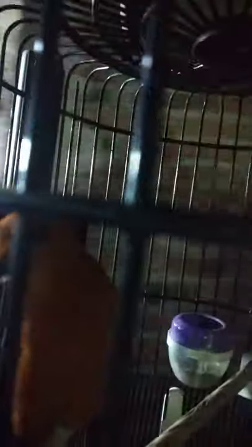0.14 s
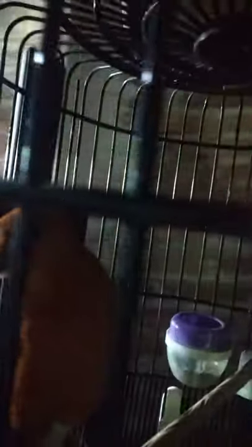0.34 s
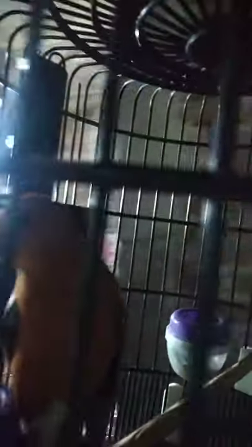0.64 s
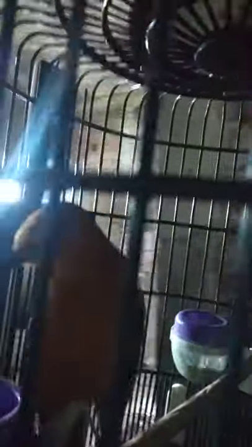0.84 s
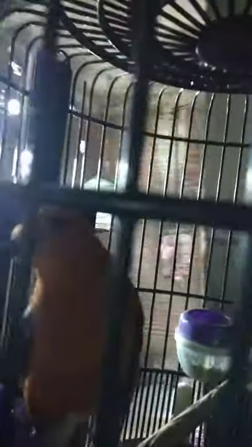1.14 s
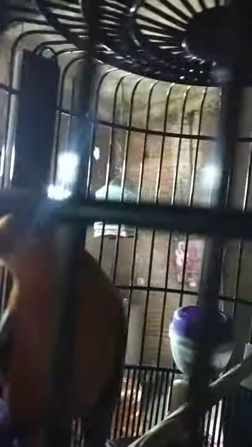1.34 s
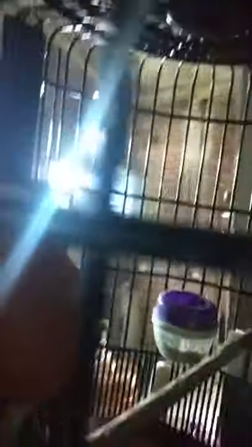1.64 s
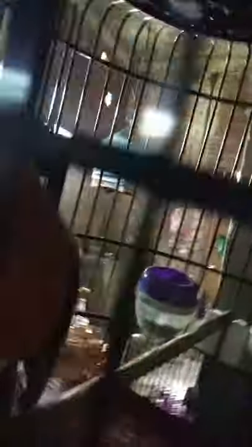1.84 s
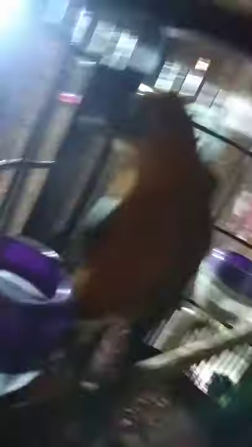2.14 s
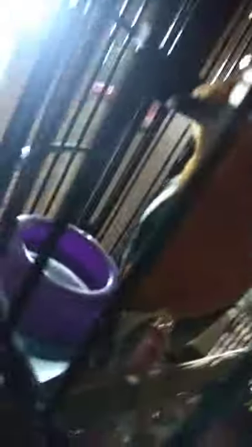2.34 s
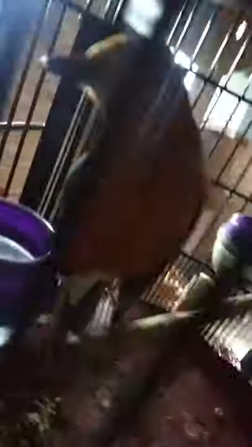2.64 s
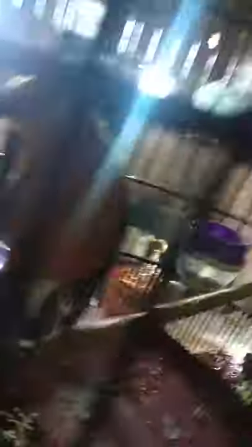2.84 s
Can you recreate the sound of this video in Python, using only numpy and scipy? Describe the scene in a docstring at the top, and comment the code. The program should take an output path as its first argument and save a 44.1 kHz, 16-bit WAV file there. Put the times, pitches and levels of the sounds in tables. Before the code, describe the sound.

Songbird whistling a gliding, at first hoarse phrase indoors, over thin high chips and a sharp click

```python
"""A caged songbird sings a phrase of slurred whistles in a hard-walled room, close to a hand-held camera:
gliding near-sine tones with overtones and air hiss, hoarse at first. A smaller bird repeats a thin high
chip, a dipping sine, and a third answers with one faint rising whistle; room reflections smear every note.
At the camera a sharp click and a faint one (ringing modes), knocks (damped low rings) and scuffs (noise
swells) sit with one faint peep (a narrow noise swell) over a low background rumble of filtered noise."""
import sys
import numpy as np
from scipy import signal
from scipy.fft import rfft, irfft
from scipy.io import wavfile
from scipy.ndimage import uniform_filter1d

SR = 44100
rng = np.random.default_rng(int(sys.argv[2]) if len(sys.argv) > 2 else 0)


def transcribe(u):
    """Save the signal u as a 16-bit wav file named by the first command-line argument.

    u: samples, shape (n,) or (channels, n), limited to [-1, 1]; the rate is SR.
    q: integer samples, one column per channel.
    """
    v = np.clip(np.atleast_2d(u).T, -1, 1)
    q = np.round(v * 32767).astype(np.int16)
    wavfile.write(sys.argv[1], SR, q)


N = 132300  # 3 s in samples


def amp(db):
    """Decibels to gain."""
    return 10 ** (np.asarray(db) / 20)


def unit(x):
    """Scales to rms 1."""
    return x / np.sqrt(np.mean(x ** 2) + 1e-20)


def read(points, hz):
    """Reads a spectrum on a log-frequency axis."""
    f, value = np.transpose(points)
    return np.interp(np.log(hz + 1), np.log(f + 1), value)


def add(mix, s, sound):
    """Mixes a sound in at s seconds."""
    part = mix[:, max(round(s * SR), 0):][:, :sound.shape[-1]]
    part += sound[..., :part.shape[1]]


def pan(db):
    """Left and right gains of equal total power, left louder than right by db."""
    return unit(amp([[db / 2], [-db / 2]]))


def noise(size, gain):
    """Start of a noise of rms 1 with the spectrum gain(hz)."""
    spectrum = rfft(rng.standard_normal(N)) * gain(np.fft.rfftfreq(N, 1 / SR))
    return unit(irfft(spectrum, N))[:size]


def hump(f, centre_hz, width_hz):
    """Gain of one broad resonance."""
    return 1 / (1 + (2 * (f - centre_hz) / width_hz) ** 2)


def later(x, s):
    """Delays a sound by s seconds, to a fraction of a sample, with a phase slope."""
    size = x.shape[-1]
    return irfft(rfft(x) * np.exp(-2j * np.pi * np.fft.rfftfreq(size, 1 / SR) * s), size)


def arrive(x, lag_s):
    """Direct sound at two spaced microphones, the right one lag_s later."""
    return np.array([x[0], later(x[1], lag_s)])


def turns(hz):
    """Phase in radians of a tone whose pitch moves."""
    return 2 * np.pi * np.cumsum(hz) / SR


def glide(points, fade_s=0.0014):
    """Time, pitch and loudness along one slurred note."""
    s, hz, db = np.transpose(points)
    t = np.arange(s[0], s[-1], 1 / SR)
    ends = np.clip(np.minimum(t - t[0], t[-1] - t) / fade_s, 0, 1)
    pitch = uniform_filter1d(np.interp(t, s, hz), size=400)  # rounds the corners of the slur
    return t, pitch, ends * amp(np.interp(t, s, db))


def songbird():
    """A near-sine whistle, steadiest when loud, with overtones and air hiss; when hoarse it buzzes and rasps."""
    # One list for each whistle. Each row: time in seconds, pitch in Hz, level in dB before the path gains.
    whistles = [
        [(1.052, 2256, -55.5), (1.068, 2384, -41.5), (1.10, 2402, -33), (1.112, 2826, -30.5),
         (1.136, 3250, -25), (1.178, 3033, -24.5), (1.208, 2654, -22.5), (1.285, 2558, -23), (1.335, 2518, -28),
         (1.42, 2577, -39.5)],
        [(1.455, 2546, -42.5), (1.485, 2463, -27.5), (1.52, 2290, -32), (1.555, 2036, -38), (1.585, 2040, -55)],
        [(1.648, 2510, -38.5), (1.675, 2483, -29), (1.70, 2253, -31), (1.73, 2023, -33.5), (1.775, 2017, -30.5),
         (1.808, 2437, -31), (1.85, 2439, -23), (1.872, 2450, -52)],
        [(2.008, 5216, -35.5), (2.03, 5076, -29.5), (2.055, 4704, -23), (2.085, 4370, -25), (2.16, 4192, -24.5),
         (2.22, 4062, -23), (2.27, 3993, -29.5), (2.30, 3820, -65)],
        [(2.348, 3680, -50), (2.38, 3333, -20.5), (2.41, 3232, -26), (2.445, 3188, -24.5), (2.48, 3170, -43)],
        [(2.52, 3476, -45), (2.54, 3304, -19), (2.59, 3220, -27), (2.615, 3176, -20.5), (2.64, 3160, -39.5)],
        [(2.705, 2250, -43), (2.73, 2310, -33), (2.775, 2265, -33), (2.81, 2305, -23), (2.843, 2316, -15.5),
         (2.88, 2315, -30), (2.92, 2312, -43)],
        [(2.96, 2800, -54.5), (2.99, 3096, -28), (3.02, 3180, -31)],
    ]
    # Colour of each whistle. Each row: overtones in dB, air hiss in dB, left over right in dB,
    # pitch jitter in % when no louder than usual, room echo in dB; levels stand before the path gains.
    colours = [(-30.5, -32.5, 0.5, 0.26, -3.5), (-23, -37, -1.5, 2.4, -1), (-22, -32.5, 1, 1.92, -5.5),
               (-14.5, -27, -2, 0.73, -2), (-32, -29, -1.5, 0.74, -3), (-34, -26.5, 2, 0.32, -2.5),
               (-31.5, -27.5, 2.5, 1.6, -8.5), (-36, -36, 12, 3, 3)]
    # The phrase opens hoarsely. Each row: time in seconds, roughness from 0 to 1.
    hoarseness = [(1.06, 0.74), (1.125, 0.92), (1.17, 0.72), (1.225, 0.37), (1.27, 0)]
    # Tone of the overtones. Each row: frequency in Hz, gain in dB.
    overtone_tilt = [(4000, -5), (5000, -13), (6200, -6.5), (7500, -24.5), (8300, -4.5), (9800, 6),
                     (11200, 10.5), (12300, 1.5), (14000, -4.5), (16000, -30)]
    # Level in dB of overtones 2 to 7, before the tone above.
    harmonics_db = [3, 1.5, 3, -2.5, -9.5, -10]
    # Spectrum of the air hiss. Each row: frequency in Hz, relative density in dB per Hz.
    air_spectrum = [(1800, -4), (3500, 1.5), (4500, 3.5), (5500, 0), (7400, -9), (8600, -18), (10200, 4.5),
                    (12000, -11), (14000, -44), (16000, -32)]
    # Spectrum of the hoarse rasp. Each row: frequency in Hz, relative density in dB per Hz.
    rasp_spectrum = [(3000, -26.5), (3600, -3), (3950, 2), (4500, -3), (5300, 0), (6000, -1), (6600, 3),
                     (8000, 4.5), (10800, -4), (12500, -14.5), (14200, -22), (15500, -11)]

    jitter_hz = 201  # corner of the pitch jitter
    smear_rad, smear_hz = 0.75, 480  # breath blurs the overtones: phase wobble, its corner
    # the hoarse voice is a fast uneven trill: rate, its scatter, depth of its pulses, pitch swing
    buzz_hz, buzz_wander, buzz_pulsing, rasp_depth = 162.9, 0.256, 0.55, 0.099
    rasp_hiss_db, rasp_overtone_db = -10.5, 4.5  # hoarseness adds hiss and brings out the overtones
    edge_follows, usual_db = 0.5, -29  # the edge swells less than the whistle, around its usual level
    song_direct_db, song_lag_s = -3, 0.00009
    edge_direct_db = -10.5  # overtones and hiss reach the microphone mostly by way of the walls

    tone, wet, edge = np.zeros((3, 2, N))
    for points, (overtone_db, air_db, side_db, jitter_percent, room_db) in zip(whistles, colours):
        t, hz, level = glide(points)
        rough = np.interp(t, *np.transpose(hoarseness), right=0)

        jitter = noise(len(t), lambda f: 1 / (1 + (f / jitter_hz) ** 4))
        share = jitter_percent / 100 * np.minimum(amp(usual_db) / level, 1) ** 2
        buzz = turns(buzz_hz * (1 + buzz_wander * jitter))
        pulses = 1 + buzz_pulsing * rough * np.cos(buzz)
        phase = turns(hz * (1 + share * jitter - rasp_depth * rough ** 2 * np.sin(buzz)))
        whistle = pan(side_db) * level * pulses * np.sqrt(2) * np.sin(phase)

        smear = smear_rad * noise(len(t), lambda f: 1 / (1 + (f / smear_hz) ** 2))
        overtones = 0
        for k, db in enumerate(harmonics_db, 2):
            gain = amp(db + read(overtone_tilt, k * hz)) * (k * hz < SR / 2)
            overtones = overtones + gain * np.sin(k * phase + smear)
        overtones = np.sqrt(2) * amp(overtone_db + rasp_overtone_db * rough) * overtones
        air = noise(len(t), lambda f: amp(read(air_spectrum, f))) * amp(air_db)
        rasp = noise(len(t), lambda f: amp(read(rasp_spectrum, f))) * amp(rasp_hiss_db) * rough
        swell = amp(usual_db) * (level / amp(usual_db)) ** edge_follows * pulses

        add(tone, t[0], whistle)
        add(wet, t[0], amp(room_db) * whistle)
        add(edge, t[0], swell * (overtones + air + rasp))
    edge = cage(edge)
    direct = arrive(tone + amp(edge_direct_db) * edge, song_lag_s)
    return amp(song_direct_db) * direct + room(wet + edge)


def cage(x, count=4):
    """Scatter from the bars combs the treble: a few very short reflections, different on each side."""
    scatter_db, longest_s = -7.5, 0.0024
    delays = rng.uniform(0, longest_s, (2, count))
    signs = rng.choice([-1, 1], (2, count))
    scatter = np.array([sum(g * later(side, s) for s, g in zip(d, sign))
                        for side, d, sign in zip(x, delays, signs)])
    return (x + amp(scatter_db) * scatter) / np.sqrt(1 + count * amp(scatter_db) ** 2)


def small_bird():
    """Each chip dips quickly in pitch, cracks at the bottom and holds a higher note as it fades."""
    # Each row: bottom of the dip in seconds, lowest pitch in Hz, closing pitch in Hz,
    # level in dB before the path gains, fade in seconds, left over right in dB.
    chips = [(-.2, 5290, 5900, -26, 0.0093, 2), (0.2347, 5275, 5952, -23, .011, 0.5),
             (0.687, 5390, 6082, -27.5, 0.029, 6.5), (1.0815, 5265, 6020, -28.5, 0.019, 1.5),
             (1.4757, 5480, 6058, -30.5, 0.024, -0.5), (1.863, 5470, 6076, -30.5, 0.014, -1.5),
             (2.262, 5590, 6093, -30.5, 0.023, -4.5), (2.581, 5475, 6310, -31.5, 0.017, -3.5),
             (2.845, 5760, 6224, -32.5, 0.016, -7)]
    start_hz, dip_s, lead_s, lead_db = 6253, 0.003174, 0.0089, -21.5  # a chip starts high and soft
    scrape_db, scrape_hz, scrape_width_hz = -20, 5190, 2300  # the voice cracks at the bottom of the dip
    scrape_lingers = 0.23  # share of that scrape left in the held note
    echo_s, echo_db = 0.045, -8.5  # slap from one wall
    direct_db, room_db = -2.5, -1.5
    lag_s = -0.000055  # negative: the right microphone hears it first
    pre_roll = SR // 4  # a chip just before the start still echoes

    out = np.zeros((2, pre_roll + N))
    t = np.arange(-lead_s, .1, 1 / SR)
    for s, low_hz, end_hz, db, fade_s, side_db in chips:
        dip = np.exp(-(t / dip_s) ** 2)
        hz = low_hz + (np.where(t < 0, start_hz, end_hz) - low_hz) * (1 - dip)
        approach = amp(db + lead_db * (np.minimum(t, 0) / lead_s) ** 2)
        level = approach * np.exp(-(np.maximum(t, 0) / fade_s) ** 2)
        grain = noise(len(t), lambda f: hump(f, scrape_hz, scrape_width_hz))
        scrape = amp(scrape_db) * (dip + scrape_lingers) * grain
        chip = np.sqrt(2) * np.sin(turns(hz)) + scrape
        add(out, pre_roll / SR + s - lead_s, pan(side_db) * level * chip)
    direct = arrive(out + amp(echo_db) * later(out, echo_s), lag_s)
    return (amp(direct_db) * direct + amp(room_db) * room(out))[:, pre_roll:]


def far_bird():
    """One faint rising sine whistle, mostly echo."""
    # Each row: time in seconds, pitch in Hz, peak level in dB before the echo is added.
    far_whistle = [(.50, 2340, -62.5), (.555, 2786, -62.5), (.625, 3178, -55), (.69, 3190, -69),
                   (.725, 3510, -58)]
    out = np.zeros((2, N))
    t, hz, level = glide(far_whistle)
    add(out, t[0], level * np.sin(turns(hz)))
    return out + amp(5.5) * room(out)


def room(x):
    """Dense reflections of random sign, each band dying at its own speed."""
    # Each row: frequency in Hz, time to fall 60 dB in seconds.
    room_t60 = [(500, 0.11), (2500, 0.32), (4200, 0.31), (6000, 0.57), (10000, 0.23), (15000, 0.21)]
    early_db, early_s = 2.5, 0.0092  # nearby walls thicken the start of the echo
    slots = np.arange(130, 30000, 12)  # samples; one reflection falls somewhere in each
    taps = np.zeros((2, 2 ** 15))
    at = slots + rng.integers(0, 12, (2, len(slots)))
    np.put_along_axis(taps, at, rng.standard_normal(at.shape), 1)
    hz, t, z = signal.stft(taps, SR, nperseg=256)
    early = amp(early_db * np.exp(-t / early_s))
    decay = np.exp(-np.log(1000) * t / read(room_t60, hz)[:, None])
    tail = signal.istft(z * early * decay, SR)[1]
    tail = tail / np.linalg.norm(tail, axis=1, keepdims=True)
    return signal.fftconvolve(x, tail, axes=1)[:, :x.shape[1]]


def clicks():
    """Tiny hard contacts right at the left microphone ring in a few modes, too close to carry any echo."""
    # Each row: start in seconds, left peak in dB before the ceiling.
    click_times = [(1.9564, 2), (2.0150, -28)]
    # Ringing modes of a click. Each row: frequency in Hz, relative level in dB, time to fall 60 dB in seconds.
    modes = [(8320, 3.5, 0.00072), (10300, -19, 0.0044), (5840, 1.5, 0.00049), (14300, -11, 0.0012),
             (1193, -36, 0.0013)]
    right_db, lag_s = -16.5, 0.00011  # weaker and later at the right microphone
    out, t = np.zeros((2, N)), np.arange(0, .01, 1 / SR)
    ring = sum(amp(db) * np.exp(-np.log(1000) * t / t60) * np.sin(2 * np.pi * hz * t)
               for hz, db, t60 in modes)
    ring = ring * (1 - np.exp(-t / .0001))
    for s, db in click_times:
        tick = amp(db) * ring / abs(ring).max()
        add(out[:1], s, tick)
        add(out[1:], s + lag_s, amp(right_db) * tick)
    return out


def thumps():
    """Each knock on the camera body is a quickly damped low ring on top of one slow swing of pressure."""
    # Each row: start in seconds, level in dB before rise and pan, ring in Hz, slow push in dB against the ring.
    knocks = [(2.2655, -28, 215, 0), (2.3605, -27.5, 170, -14)]
    decay_s, push_s = 0.0038, 0.0052
    out, t = np.zeros((2, N)), np.arange(0, .06, 1 / SR)
    rise = 1 - np.exp(-t / 0.00061)
    push = (1 - t / push_s) * np.exp(-t / push_s) * 2
    for s, db, hz, push_db in knocks:
        ring = np.sin(2 * np.pi * hz * t) * np.exp(-t / decay_s)
        knock = amp(db) * rise * (ring + amp(push_db) * push)
        add(out, s, pan(-13) * knock)  # mostly on the right
    return out


def bumps_and_peep():
    """Handling bumps and scuffs, and one faint peep near 1.5 kHz: short swells of noise in one resonance."""
    # The last row is the peep. Each row: peak of the swell in seconds, level in dB, rise in seconds,
    # decay in seconds, centre in Hz, width in Hz.
    swells = [(2.261, -43, 0.012, 0.011, 650, 9200), (2.364, -51.5, 0.0076, 0.038, 370, 3100),
              (2.06, -51, 0.016, 0.075, 436, 270), (1.706, -51, 0.002, 0.015, 680, 720),
              (0.24, -59, 0.0051, 0.027, 2700, 3300), (0.439, -58.5, 0.035, 0.035, 1430, 1900),
              (.827, -55.5, 0.0061, 0.0069, 1560, 280)]
    t, out = np.arange(N) / SR, np.zeros((2, N))
    for s, db, rise_s, decay_s, centre_hz, width_hz in swells:
        shared, left, right = (noise(N, lambda f: hump(f, centre_hz, width_hz)) for _ in range(3))
        level = amp(db) * np.exp(-np.maximum((s - t) / rise_s, (t - s) / decay_s))
        out += level * unit(shared + np.array([left, right]))
    return out


def background():
    """Steady low rumble and faint hiss: shaped noise, partly shared by both sides."""
    # Each row: frequency in Hz, relative density in dB per Hz.
    floor_spectrum = [(12, -30), (20, -3), (58, -2), (101, -8), (210, -13), (459, -23), (780, -30),
                      (1290, -32), (5230, -36.5)]
    floor_db, same, left_db = -51, 0.36, 0.5  # rms level, shared power 0-1, left over right in dB
    shared, left, right = (noise(N, lambda f: amp(read(floor_spectrum, f))) for _ in range(3))
    both = np.sqrt(same) * shared + np.sqrt(1 - same) * np.array([left, right])
    return amp(floor_db) * pan(left_db) * both


def scene():
    """Three birds, the clicks, knocks, scuffs and peep, and the background."""
    birds = songbird() + small_bird() + far_bird()
    small_sounds = clicks() + thumps() + bumps_and_peep()
    return birds + small_sounds + background()


def record(dry):
    """Full-scale ceiling, then the band limit."""
    edge_hz = 15950
    low_pass = signal.firwin(511, edge_hz, window=("kaiser", 9), fs=SR)
    return signal.oaconvolve(np.clip(dry, -1, 1), low_pass[None], "same")


dry = scene()
out = record(dry)
transcribe(out)
```